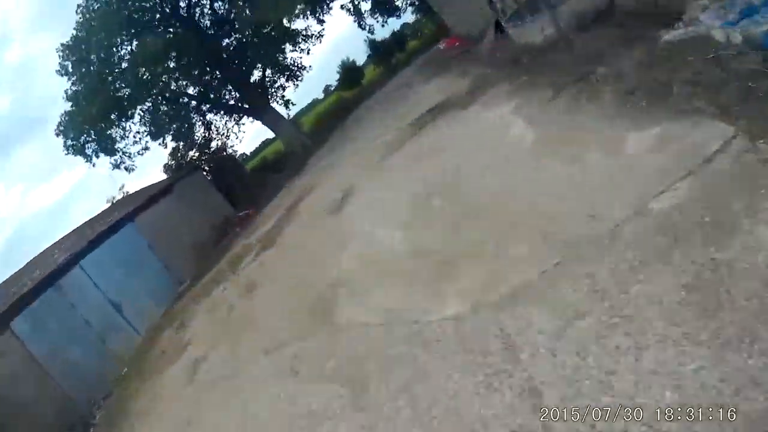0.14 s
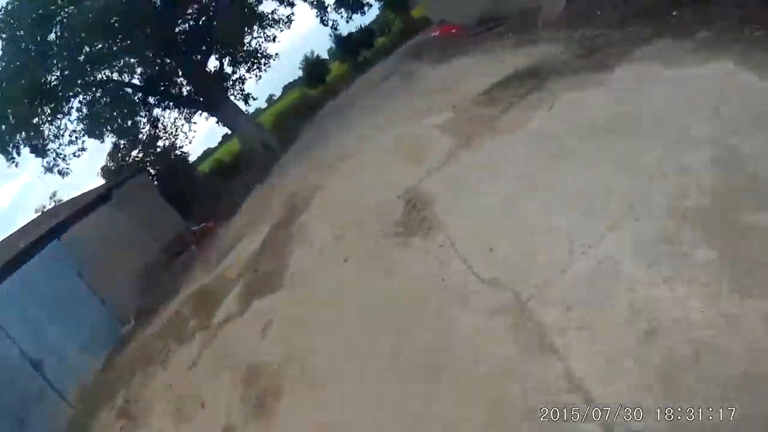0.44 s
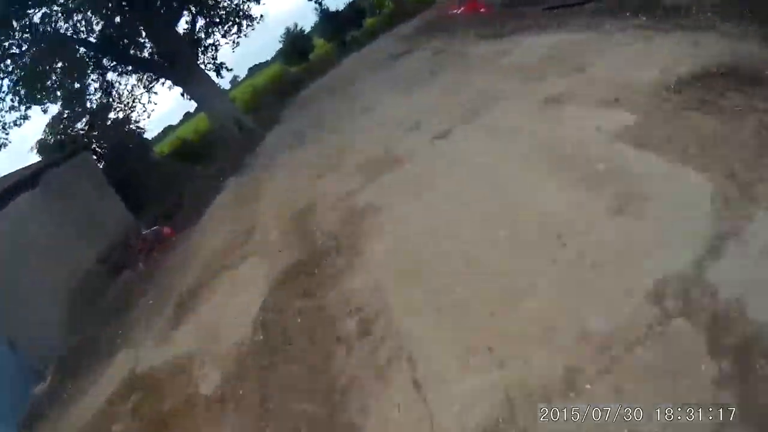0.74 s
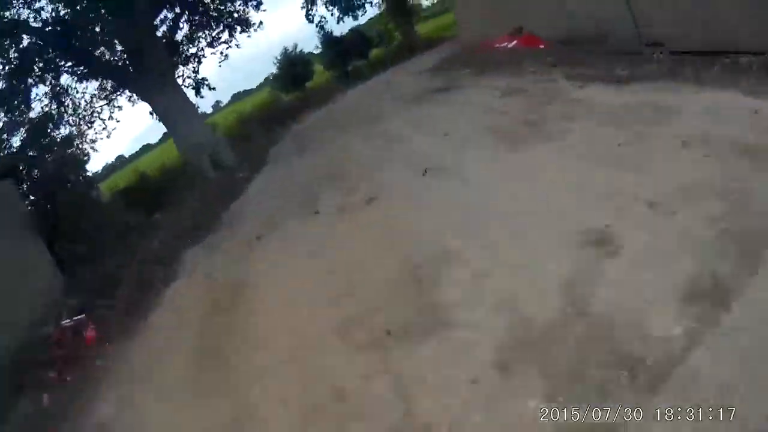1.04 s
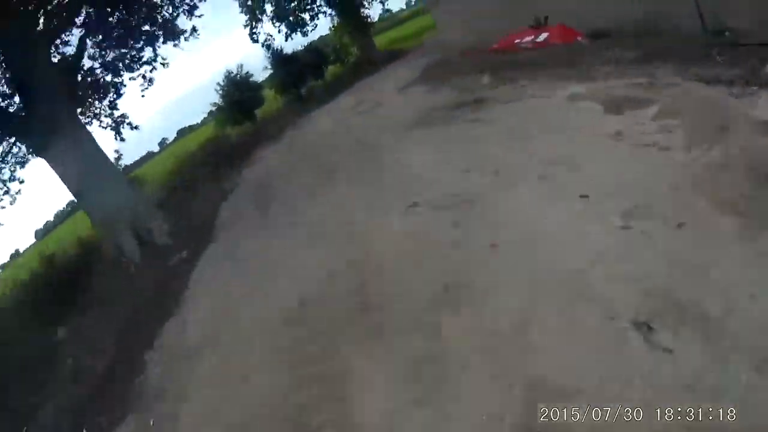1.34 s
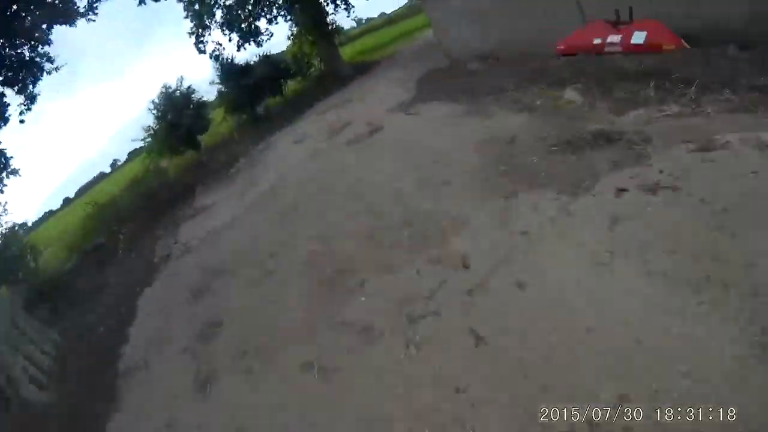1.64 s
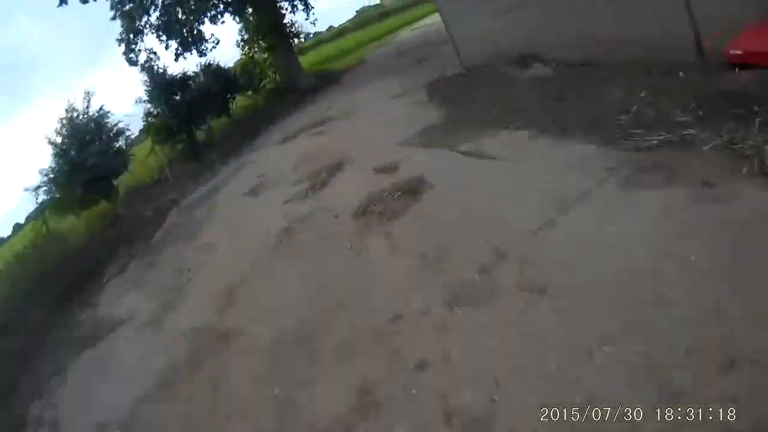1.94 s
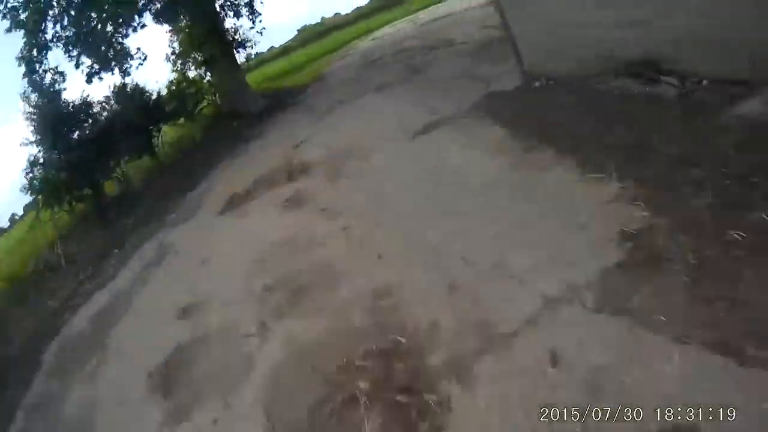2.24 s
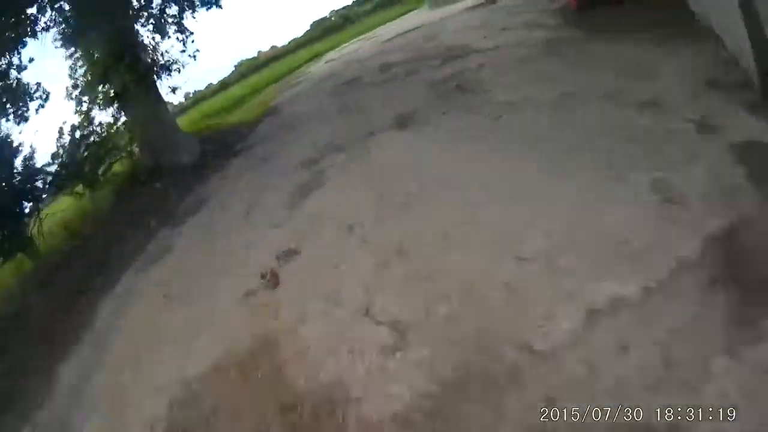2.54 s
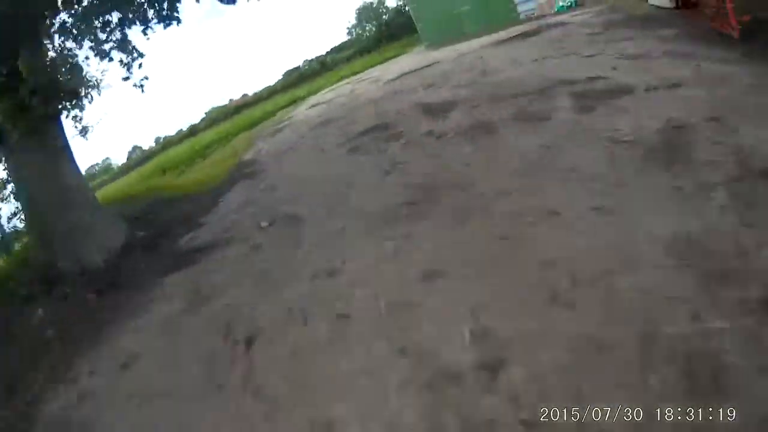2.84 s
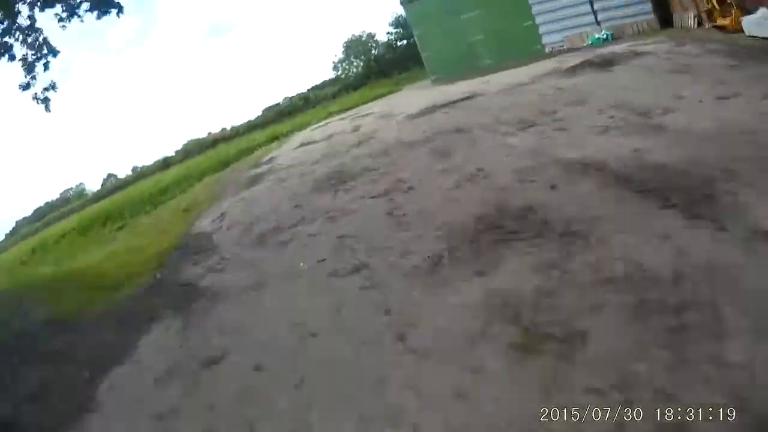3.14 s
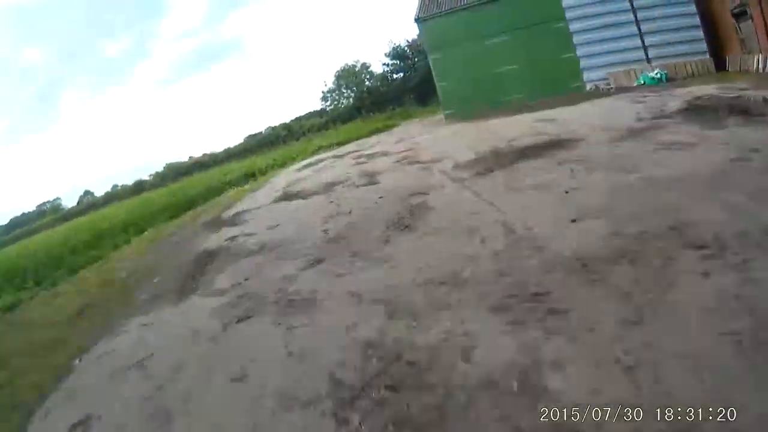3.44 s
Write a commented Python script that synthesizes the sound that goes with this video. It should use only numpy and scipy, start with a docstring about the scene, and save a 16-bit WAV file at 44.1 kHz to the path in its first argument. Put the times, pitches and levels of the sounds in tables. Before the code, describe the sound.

A racing quadcopter whines continuously, its four propellers beating against each other in a harsh buzz with rushing air, pitch climbing slightly; outdoors over a farmyard, heard from a microphone fixed on the drone, slightly overloaded.

```python
"""Low over a farmyard: a racing quadcopter in flight, heard by a microphone on its own frame.
Four two-bladed propellers, each a shaft hum, blade tone, overtones and thin motor whine, beat together.
The blades chop a rush of coloured noise, the frame rattles in throbs, wash buffets the microphone,
and its overload rounds off every crest."""
import sys
import numpy as np
from scipy.fft import rfft, irfft, next_fast_len
from scipy.io import wavfile
from scipy.ndimage import map_coordinates

SR = 44100
rng = np.random.default_rng(int(sys.argv[2]) if len(sys.argv) > 2 else 0)


def wav_out(sig):
    """Save sig, one row per channel (or a flat mono array), as 16-bit PCM at SR to the path in sys.argv[1]."""
    wavfile.write(sys.argv[1], SR, np.round(np.clip(np.atleast_2d(sig).T, -1, 1) * 32767).astype(np.int16))


N = 158760


def amp(db):
    """Amplitude ratio of a level in dB."""
    return 10 ** (np.asarray(db) / 20)


def unit(x):
    """x scaled to rms 1."""
    return x / np.sqrt(np.mean(x ** 2) + 1e-20)


def along(points, hz):
    """Value at hz from (Hz, value) points, linear over log frequency."""
    point_hz, values = np.transpose(points)
    return np.interp(np.log(hz + 1), np.log(point_hz + 1), values)


def curve(rows):
    """One value per sample from (s, value) rows."""
    return np.interp(np.arange(N) / SR, *np.transpose(rows))


def wobble(knots_per_s):
    """Smooth random curve through normally distributed knots."""
    knots = rng.standard_normal(int(N * knots_per_s / SR) + 4)
    return map_coordinates(knots, [np.arange(N) * knots_per_s / SR])


def filtered(x, response):
    """x with its spectrum multiplied by response(hz)."""
    size = next_fast_len(N + SR // 4)
    hz = np.fft.rfftfreq(size, 1 / SR)
    return irfft(rfft(x, size) * response(hz), size)[..., :N]


def noise(spectrum):
    """Gaussian noise coloured by (Hz, dB) points, rms 1."""
    white = rng.standard_normal(N)
    return unit(filtered(white, lambda hz: amp(along(spectrum, hz))))


def tone(phase, rms_db, flutter_db):
    """Sine at an rms level that flutters at random."""
    level_db = rms_db + flutter_db * wobble(25.07)
    return np.sqrt(2) * amp(level_db) * np.sin(phase)


def wind():
    """Propeller wash buffets the microphone: low noise of uneven level."""
    # buffeting spectrum: freq_hz, density_db (relative, per Hz)
    wind_spectrum = [(15, -10), (35, -28), (60, -12), (90, -11), (160, -10), (300, -11), (800, -9.5),
                     (3000, -60)]
    # buffeting level: start_s, level_db
    wind_level = [(0, -21), (.25, -27), (.6, -31), (1.5, -31.5), (2.1, -22.5), (2.6, -29.5), (3.6, -26)]
    gust_db = 1.4
    return noise(wind_spectrum) * amp(curve(wind_level) + gust_db * wobble(11))


def rasp(slow_hz, beat_phase):
    """The frame rattles near one slow-propeller rate, strongest when the two loud propellers oppose."""
    # rattle spectrum: freq_hz, density_db (relative, per Hz)
    rasp_spectrum = [(300, -30), (1200, 0), (1600, 2.5), (2050, 3.5), (2500, -15.5), (3050, -3),
                     (4000, -17), (6300, -26), (6900, -7), (7350, -7.5), (7900, -20), (10500, -24),
                     (15000, -31)]
    peak_hz, width_hz = 354, 23  # slow propeller's blade-pass rate
    mid_db, throb_db = -19.5, 5
    near = np.exp(-((slow_hz - peak_hz) / width_hz) ** 2 / 2)
    throb = amp(mid_db - throb_db * np.cos(beat_phase))
    return throb * near * noise(rasp_spectrum)


def rush(slow_phase, main_phase, effort_db):
    """Torn air and tip hiss, chopped at each blade pass and swelling when the loud pair is in step."""
    # torn-air spectrum: freq_hz, density_db (relative, per Hz)
    rush_spectrum = [(100, -1), (250, -1), (520, 4), (700, 5.5), (1050, 2), (1400, 7), (1650, 7.5),
                     (2050, 2.5), (2550, -5), (3050, -5), (3900, -8.5), (4450, -0.5), (4950, -0.5),
                     (5500, -3), (6000, -11.5), (6600, -9.5), (7200, -9), (7800, -13), (9300, -11),
                     (9900, -16.5), (10800, -15), (13000, -23), (14700, -22), (15400, -26)]
    # torn-air level: start_s, level_db
    rush_level = [(0, -19.5), (.2, -18), (.5, -18.5), (.9, -19.5), (1.5, -17.5), (2.1, -18), (2.45, -19),
                  (2.8, -15), (3.2, -15), (3.6, -16)]
    # gain of its treble over the rest: start_s, gain_db
    treble_level = [(0, 4.5), (.5, 2.5), (1, 2), (1.8, 1), (2.4, 5), (2.8, 3.5), (3.6, 4.5)]
    # tip-hiss spectrum: freq_hz, density_db (relative, per Hz)
    hiss_spectrum = [(3000, -28), (7000, -4), (11000, 0), (12500, -1), (15000, -9), (15700, -14)]
    treble_from_hz = 3640
    hiss_at_zero_effort_db, hiss_db_per_effort_db = -40.5, 12
    chop_depth, beat_swell_db = 0.11, 2.7

    air = noise(rush_spectrum)
    treble = filtered(air, lambda hz: hz ** 2 / (hz ** 2 + treble_from_hz ** 2))
    air = air + (amp(curve(treble_level)) - 1) * treble
    air = air * amp(curve(rush_level))
    hiss = noise(hiss_spectrum) * amp(hiss_at_zero_effort_db + hiss_db_per_effort_db * effort_db)

    blade_chop = np.exp(chop_depth * (np.cos(slow_phase) + np.cos(main_phase)))
    beat_swell = amp(beat_swell_db * np.cos(main_phase - slow_phase))
    return (air + hiss) * unit(blade_chop * beat_swell)


def spin(rate_rows):
    """Blade-pass rate and phase; the flight controller adds small fast speed corrections."""
    jitter_ratio, jitter_knots_per_s = 0.0014, 45
    hz = curve(rate_rows) * (1 + jitter_ratio * wobble(jitter_knots_per_s))
    phase = 2 * np.pi * (np.cumsum(hz) / SR + rng.uniform())
    return hz, phase


def rotor(hz, phase, levels, effort_db):
    """Shaft imbalance at half the blade rate, blade tone and overtones, motor whine through the frame."""
    # frame's transmission of the whine: freq_hz, gain_db
    whine_colour = [(7000, 6), (7250, 2), (7500, 1), (7800, -34), (8200, -23), (8350, -5), (8700, -2.5),
                    (9050, 0.5), (9300, -7), (9480, -11), (9650, -21), (10100, -30)]
    # whine gain over time: start_s, gain_db
    whine_level = [(0, 2), (2.6, -1.5), (2.75, -1), (3.6, -3)]
    whine_order = 21  # multiple of blade-pass rate
    shaft_flutter_db, whine_flutter_db = 1.2, 1.5
    blade_flutter_db, overtone_flutter_db = 0.4, 1.8  # blades meeting uneven air
    arm_hz, arm_width_hz, arm_db = 844, 9.3, 7  # frame resonance lifting overtones

    shaft_db, blade_db, *overtones_db, whine_db, blade_db_per_hz, overtone_db_per_hz = levels
    faster_hz = hz - np.median(hz)
    out = tone(phase / 2, shaft_db + effort_db, shaft_flutter_db)
    out += tone(phase, blade_db + effort_db + blade_db_per_hz * faster_hz, blade_flutter_db)
    for order, overtone_db in enumerate(overtones_db, 2):
        lift_db = arm_db / (1 + ((order * hz - arm_hz) / arm_width_hz) ** 2)
        level_db = overtone_db + overtone_db_per_hz * faster_hz + lift_db
        out += tone(order * phase + rng.uniform(0, 2 * np.pi), level_db, overtone_flutter_db)
    passed_db = along(whine_colour, whine_order * hz) + curve(whine_level)
    return out + tone(whine_order * phase, whine_db + passed_db, whine_flutter_db)


def scene():
    """Four rotors, their rush of air, the rattling frame and the wind, all fixed to the microphone."""
    # blade-pass rate of each propeller before jitter: start_s, rate_hz
    slow_prop = [(0.0, 352.0), (0.09, 341.1), (0.15, 355.6), (0.48, 385.3), (0.63, 379.5), (0.69, 394.2),
                 (0.99, 380.3), (1.11, 386.3), (1.17, 372.4), (1.26, 384.9), (1.35, 376.1), (1.44, 385.1),
                 (1.53, 378.0), (1.71, 386.2), (1.77, 378.1), (1.95, 383.5), (2.01, 372.3), (2.07, 380.3),
                 (2.55, 381.5), (2.61, 390.2), (3.18, 389.8), (3.24, 395.2), (3.33, 386.8), (3.59, 395.2)]
    main_prop = [(0.0, 397.0), (0.24, 399.0), (0.33, 407.9), (0.63, 418.3), (0.78, 437.1), (0.96, 434.7),
                 (1.17, 445.6), (1.23, 441.8), (1.35, 446.3), (1.44, 438.3), (1.62, 444.5), (1.71, 437.2),
                 (1.98, 443.5), (2.07, 440.5), (2.13, 450.4), (2.28, 439.0), (2.37, 445.2), (2.46, 435.7),
                 (2.67, 454.9), (2.76, 447.5), (2.88, 453.8), (2.97, 447.8), (3.12, 450.2), (3.18, 459.2),
                 (3.24, 451.1), (3.59, 450.8)]
    fast_prop = [(0.0, 460.9), (0.18, 449.1), (0.27, 456.8), (0.3, 442.9), (0.39, 451.8), (0.6, 441.7),
                 (0.93, 470.8), (1.23, 482.3), (1.65, 475.4), (1.83, 481.2), (2.07, 482.9), (2.16, 476.9),
                 (2.52, 476.0), (2.82, 498.6), (2.94, 488.4), (3.15, 498.5), (3.18, 491.9), (3.3, 503.9),
                 (3.42, 493.7), (3.59, 502.7)]
    fourth_prop = [(0, 451), (.27, 448), (.42, 436), (.58, 439), (.88, 427), (1, 430), (1.08, 423),
                   (1.17, 432), (1.27, 427), (1.4, 433), (1.5, 429), (1.6, 434), (1.93, 428), (2, 435),
                   (2.08, 424), (2.2, 434), (2.3, 427), (2.52, 434), (2.7, 448), (3.15, 455), (3.6, 452)]
    # base levels, one row per propeller (slow, main, fast, fourth): shaft_db, blade_db,
    # second_db, third_db, fourth_db, whine_db, blade_slope_db_per_hz, overtone_slope_db_per_hz
    tone_levels = [(-36.5, -11, -31, -40, -48, -32, 0.14, -0.12),
                   (-48.5, -8, -25, -29, -35.5, -35, 0.048, 0.071),
                   (-38.5, -21.5, -37.5, -26, -60, -29, 0.092, 0.12),
                   (-29.5, -32.5, -42.5, -46, -85, -35.5, 0, -0.17)]
    # throttle effort, as gain of shaft and blade tones: start_s, gain_db
    effort_rows = [(0, -0.5), (.3, -2.5), (.8, -2.6), (1.2, -2.1), (2.3, -1.6), (2.7, -1.4), (3, 0.5),
                   (3.6, 0.2)]
    # extra gain of the fast propeller's shaft and blade tones: start_s, gain_db
    fast_level = [(0, -1), (.2, 4), (.5, -2.5), (.8, 0), (1.2, -1.5), (2.5, 1), (2.8, 4), (3.6, -2)]

    spins = [spin(rows) for rows in (slow_prop, main_prop, fast_prop, fourth_prop)]
    (slow_hz, slow_phase), (_, main_phase) = spins[:2]
    effort_db = curve(effort_rows)
    efforts_db = [effort_db, effort_db, effort_db + curve(fast_level), effort_db]
    rotors = sum(rotor(hz, phase, levels, gain_db)
                 for (hz, phase), levels, gain_db in zip(spins, tone_levels, efforts_db))
    air = rush(slow_phase, main_phase, effort_db)
    rattle = rasp(slow_hz, main_phase - slow_phase)
    return (rotors + air + rattle + wind())[None]


def record(dry):
    """The microphone saturates smoothly; a steep band limit then removes the top."""
    ceiling, knee = 0.725, 6  # full scale = 1; higher knee = harder clipping
    top_hz = 15750
    clipped = dry / (1 + np.abs(dry / ceiling) ** knee) ** (1 / knee)
    return filtered(clipped - clipped.mean(), lambda hz: hz < top_hz)


dry = scene()
out = record(dry)
wav_out(out)
```